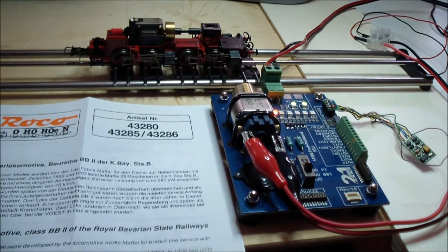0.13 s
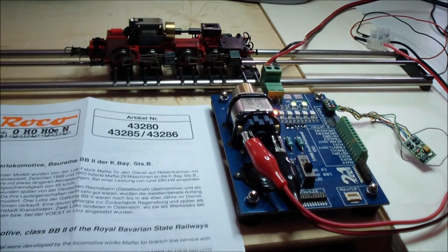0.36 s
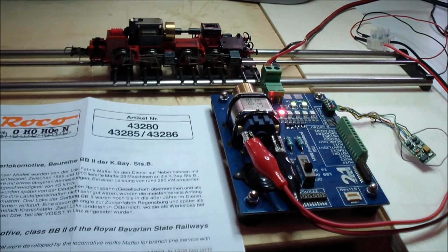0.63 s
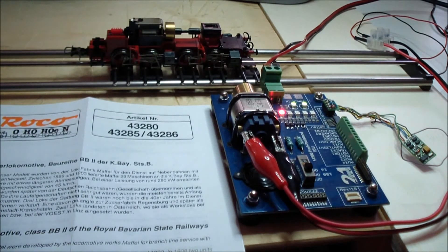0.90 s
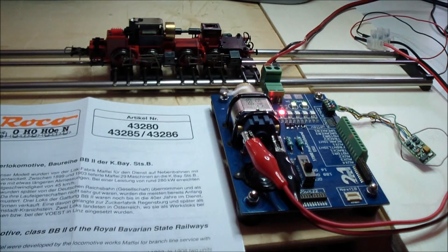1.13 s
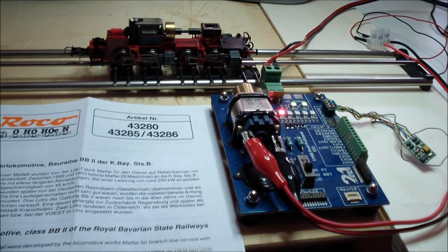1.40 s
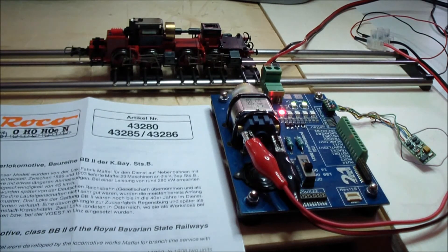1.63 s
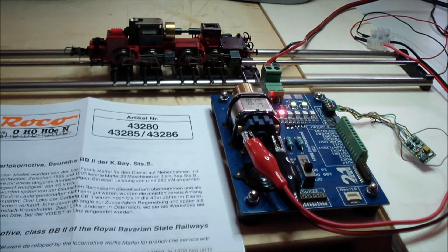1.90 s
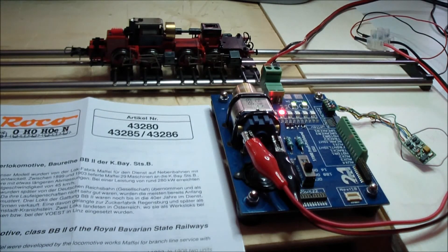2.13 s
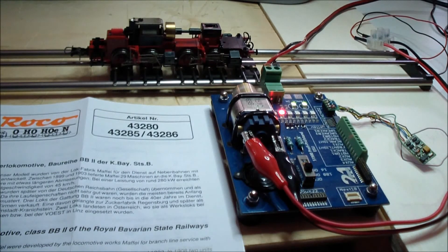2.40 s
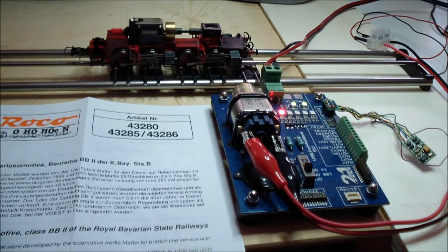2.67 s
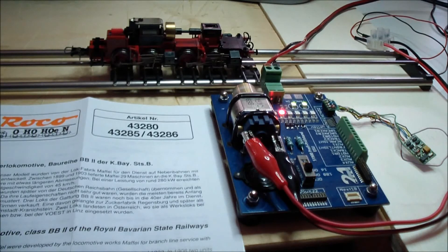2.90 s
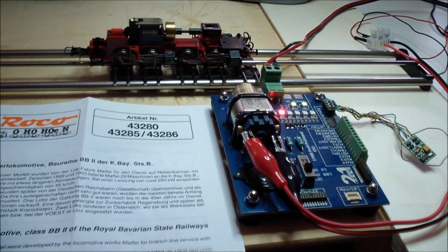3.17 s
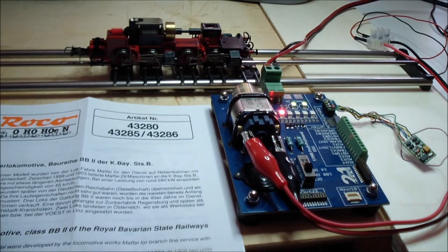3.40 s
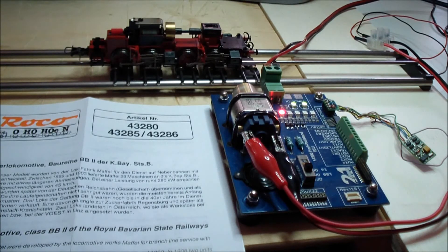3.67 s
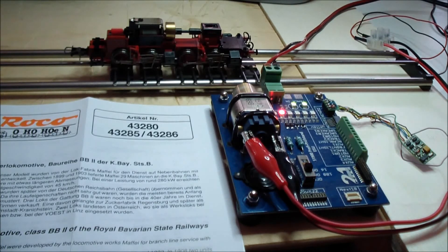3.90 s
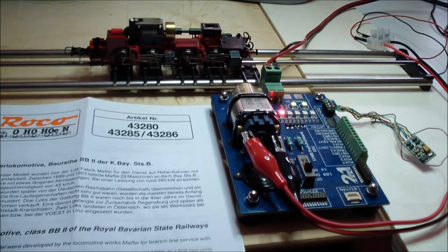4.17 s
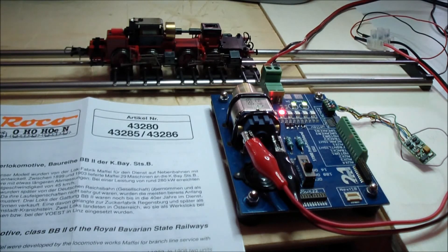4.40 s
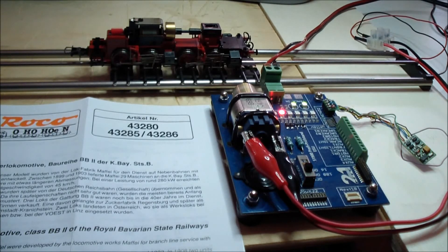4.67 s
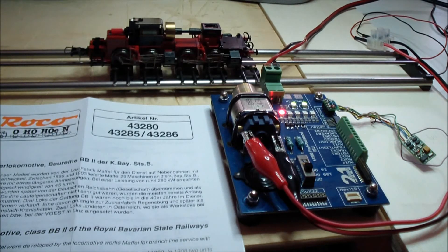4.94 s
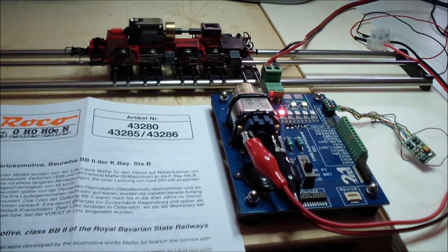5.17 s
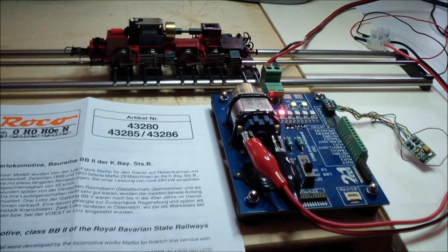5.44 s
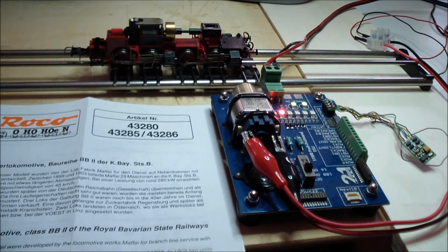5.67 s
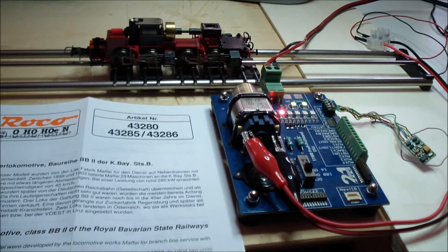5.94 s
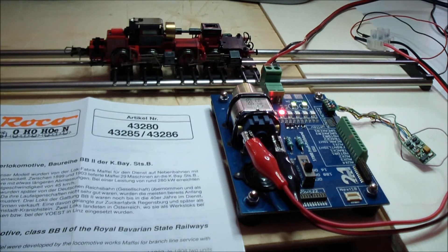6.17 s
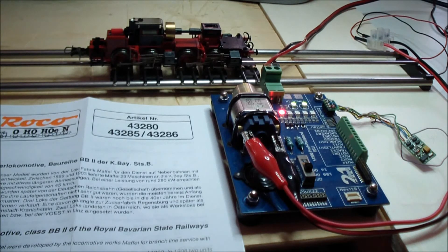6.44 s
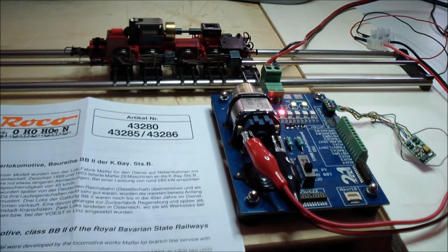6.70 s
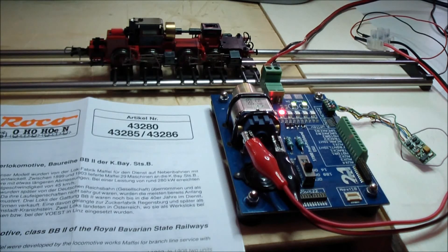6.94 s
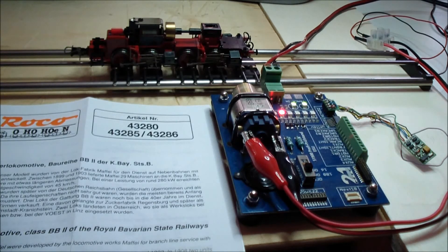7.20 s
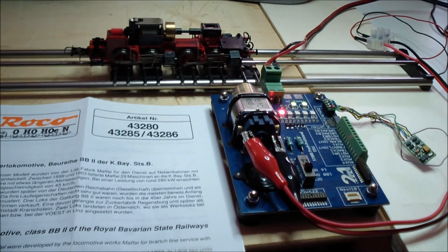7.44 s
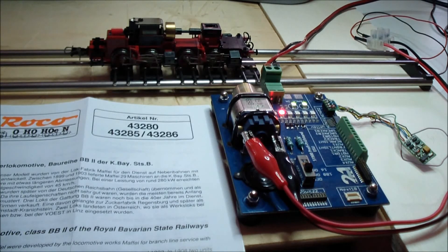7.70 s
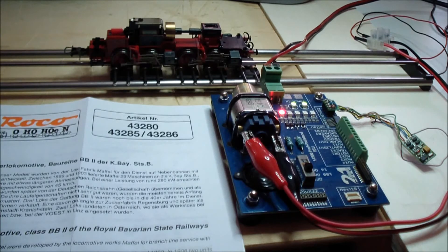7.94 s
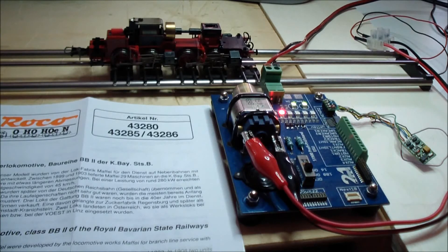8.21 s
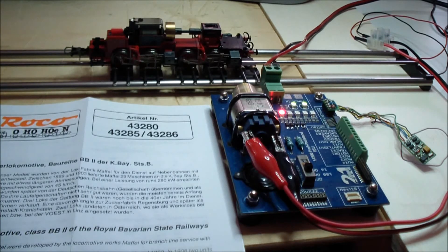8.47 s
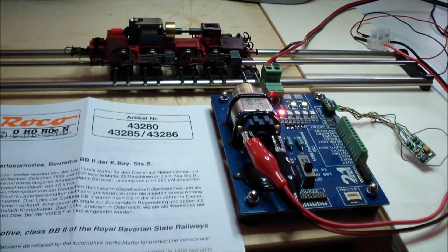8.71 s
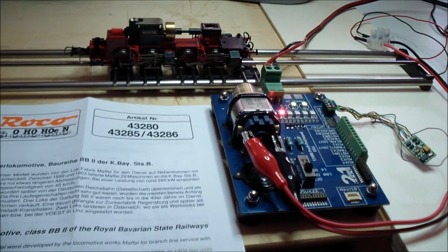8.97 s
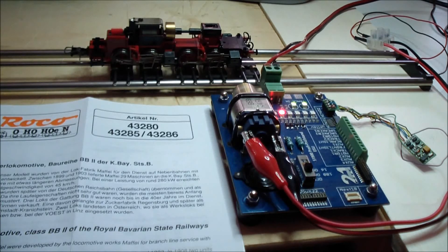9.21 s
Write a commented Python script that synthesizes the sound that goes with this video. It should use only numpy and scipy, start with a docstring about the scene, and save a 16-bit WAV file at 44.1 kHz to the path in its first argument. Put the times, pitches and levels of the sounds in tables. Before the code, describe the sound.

A small model locomotive motor ticks slowly, nearly stops, clicks free, then runs up to a steady bright brush whir with a thin whine.

```python
"""A slow chatter of gear ticks over room hiss and rumble, from a model locomotive on a roller stand indoors.
It falls nearly silent, breaks free with a click and runs up to a steady brush whir with a thin commutator whine.
Ticks and brush contacts are impulses and noise bursts ringing resonances; the whine is combed noise.
Gearbox and controller hum are wavering sines; chassis drone, hiss and rumble are filtered noise.
Weak sound drops out in short blocks, and the stereo width comes and goes in patches."""
import sys
import numpy as np
from scipy import signal
from scipy.fft import rfft, irfft, next_fast_len
from scipy.io import wavfile
from scipy.ndimage import uniform_filter1d, map_coordinates

SR = 44100
rng = np.random.default_rng(int(sys.argv[2]) if len(sys.argv) > 2 else 0)


def transcribe(u):
    """Save the signal u as a 16-bit wav file named by the first command-line argument.

    u: samples, shape (n,) or (channels, n), limited to [-1, 1]; the rate is SR.
    q: integer samples, one column per channel.
    """
    v = np.clip(np.atleast_2d(u).T, -1, 1)
    q = np.round(v * 32767).astype(np.int16)
    wavfile.write(sys.argv[1], SR, q)


def magnitude_from_level(level_db):
    """Linear magnitude for a level in decibels (20 dB per decade)."""
    exponent = np.asarray(level_db, float) / 20
    return 10 ** exponent


N = 411894
T = np.arange(N) / SR
BLOCK = 1882  # samples in a spectral block


def unit(x):
    """Scaled to rms 1."""
    return x / np.sqrt(np.mean(x ** 2) + 1e-20)


def even(x):
    """Steady loudness however fast the contacts come."""
    return x / np.sqrt(abs(uniform_filter1d(x ** 2, SR // 4)) + 1e-20)


def along(points, hz):
    """Reads (pitch_hz, value) points on a log pitch axis."""
    point_hz, value = np.transpose(points)
    return np.interp(np.log(hz + 1), np.log(point_hz + 1), value)


def curves(rows):
    """One value per sample for each column after the time."""
    s, *columns = np.transpose(rows)
    return [np.interp(T, s, column) for column in columns]


def wobble(rate):
    """A smooth random curve, rate knots a second."""
    return map_coordinates(rng.standard_normal(int(N * rate / SR) + 4), [T * rate])


def bump(s, half_s):
    """A bell-shaped rise and fall around a moment."""
    return np.exp(-((T - s) / half_s) ** 2)


def filtered(x, response):
    """x times a complex response of frequency."""
    m = next_fast_len(N + 8192)
    return irfft(rfft(x, m) * response(np.fft.rfftfreq(m, 1 / SR)), m)[..., :N]


def resonances(modes):
    """Causal response of (pitch_hz, width_hz, level_db) modes, alternating in polarity."""
    def response(f):
        total = 0
        for k, (center, width, db) in enumerate(modes):
            damping = 1j * f * width
            total = total + (-1) ** k * magnitude_from_level(db) * damping / (center * center - f * f + damping)
        return total
    return response


def passes(turns, count, jitter):
    """Samples at which the shaft passes each of count marks a turn, and the mark numbers."""
    mark = np.arange(1, int(turns[-1] * count))
    uneven = mark + jitter * rng.standard_normal(len(mark))
    at = np.interp(uneven, turns * count, np.arange(N))
    return at.astype(int), mark % count


def bursts(at, db, decay_s, order=1):
    """Short lopsided noise bursts from the given samples; order 2 rounds the attack."""
    kicks = np.bincount(at, magnitude_from_level(db), N)
    gain = (np.e / (decay_s * SR)) ** (order - 1)
    poles = np.poly([np.exp(-1 / (decay_s * SR))] * order)
    envelope = signal.lfilter([gain], poles, kicks)
    return envelope * rng.uniform(-0.76, 1, N) * np.sqrt(3)


# brush and spring resonances in low, middle and high groups: pitch_hz, width_hz, level_db (relative)
BRUSH_MODES = [
    [(7353, 310, -8), (7920, 700, -9), (8813, 530, -5.5)],
    [(9920, 810, -7.5), (11085, 560, -5)],
    [(11700, 280, -10.5), (11880, 310, -5.5), (12780, 460, -5.5), (13220, 770, -5), (15800, 2060, -10.5)],
]
# chassis and stand resonances: pitch_hz, width_hz, level_db (relative)
CHASSIS_MODES = [(557.4, 37, -3), (768, 144, -6), (1194, 537, -4.5), (1995, 114, -0.5), (2448, 250, -6),
                 (2763, 21, 3.5), (3142, 454, -11.5)]
# gear ticks while the drive crawls and pulls away: start_s, level_db (relative), knock_db (against level_db)
GEAR_TICKS = [(0.001, -33.5, -6.5), (0.0614, -34, -7.5), (0.108, -37, -14), (0.157, -35, -9),
              (0.2067, -32.5, -12), (0.254, -34, -10.5), (0.3062, -38, -9), (0.345, -38, -7),
              (0.389, -36.5, -6), (0.4299, -41, -12), (0.764, -39, -6), (0.795, -41, -3.5), (0.83, -47, -9),
              (0.9004, -41, -7), (1.0444, -42, -9), (1.2471, -44, -6), (1.283, -40, -10),
              (1.4001, -42, -28), (1.427, -37, -23), (1.436, -27.5, -18), (1.49, -34, -28),
              (1.51, -28, -20), (1.5376, -26, -18), (1.5837, -28, -16), (1.6231, -30, -19),
              (1.665, -28, -16), (1.68, -33, -19), (1.6999, -32, -26), (1.738, -25, -18), (1.752, -32, -28),
              (1.8062, -21, -22), (1.866, -20, -20), (1.888, -25, -23), (1.9214, -21, -29),
              (1.9732, -20, -23), (2.0252, -19, -23.5), (2.0721, -25, -37), (2.115, -24, -34),
              (2.152, -26, -36), (2.17, -26, -30), (2.2022, -16, -26), (2.2313, -17, -25),
              (2.2604, -12.5, -27), (2.2871, -11, -27), (2.3125, -13.5, -25), (2.338, -10, -28),
              (2.3638, -12, -28), (2.386, -11, -24), (2.409, -18, -26), (2.43, -25, -30), (2.452, -17, -26)]
# bare snaps without a rattle: start_s, level_db (relative)
BARE_SNAPS = [(0.0745, -33), (0.2757, -32), (0.391, -34), (0.7647, -30), (0.831, -35), (0.848, -34),
              (0.865, -36), (0.8824, -35), (0.9777, -39), (1.0425, -34), (1.1248, -37), (1.2471, -35),
              (1.2965, -31), (1.4002, -33), (1.7938, -29), (1.9455, -29)]
# the rattle fades under the bare snap as the drive pulls: speed_turns_per_s, rattle_db (relative)
RATTLE_BY_SPEED = [(8, 12), (11, -1), (17, -14), (40, -20)]


def ticks(speed):
    """Gear teeth take up slack: a bright snap, a short rattle and a knock in the chassis."""
    start_s, level_db, knock_db = np.transpose(GEAR_TICKS)
    at = (start_s * SR).astype(int)
    rattle_db = level_db + np.interp(speed[at], *np.transpose(RATTLE_BY_SPEED)) - 8.0
    rattle = bursts(at, rattle_db, decay_s=0.003, order=2)
    snap = np.bincount(at, magnitude_from_level(level_db + 18), N) + rattle
    for snap_s, snap_db in BARE_SNAPS:
        snap[round(snap_s * SR)] += magnitude_from_level(snap_db + 21)
    thud = bursts(at, level_db + knock_db + 15, decay_s=0.0067)
    knock = thud + np.bincount(at, magnitude_from_level(level_db + knock_db + 25), N)
    bright_modes = sum(BRUSH_MODES, [])[:-1]  # all but the broad top mode
    return filtered(snap, resonances(bright_modes)) + filtered(knock, resonances(CHASSIS_MODES))


# colour of the room and microphone hiss: pitch_hz, density_db (relative)
HISS_COLOUR = [(18, -13), (30, -24), (55, -3), (77, -5.5), (127, -5.5), (344, -9), (775, -14.5),
               (931, -20.5), (5540, -23), (7780, -25), (15800, -38)]
# width of the hiss: pitch_hz, side_minus_mid_db
HISS_WIDTH = [(60, -6), (380, -6.5), (2380, -5), (15000, 1)]
# swells of the low rumble: center_s, half_length_s, level_db
RUMBLE_SWELLS = [(1.1, 0.3, -60), (2.198, 0.33, -44.5), (4.666, 0.073, -50), (6.885, 0.08, -49),
                 (8.25, 0.047, -53), (9.137, 0.11, -54)]


def room():
    """Noise coloured into hiss, and a narrow low rumble that leans left, as mid and side."""
    def colour(f):
        mid_db = along(HISS_COLOUR, f)
        return magnitude_from_level([mid_db, mid_db + along(HISS_WIDTH, f)])

    hiss = filtered(rng.standard_normal((2, N)), colour)
    hiss = hiss * magnitude_from_level(-50.5 + 1.5 * wobble(12)) / np.std(hiss[0])
    boom = resonances([(45.5, 12, 0)])
    low = unit(filtered(rng.standard_normal((2, N)), lambda f: boom(f) ** 2))
    swell = magnitude_from_level(-64 + wobble(5.7))
    for center_s, half_s, db in RUMBLE_SWELLS:
        swell = swell + magnitude_from_level(db) * bump(center_s, half_s)
    return hiss + swell * np.array([low[0], magnitude_from_level(-11.0) * low[0] + magnitude_from_level(-15) * low[1]])


# controller hum: pitch_hz, level_db (rms, before its swell and waver)
HUM_PARTIALS = [(134.6, -66), (269.2, -61.5), (532, -62.5), (800, -66.5), (935, -70.5), (1068, -72)]


def hum():
    """The controller's wavering sines sink in the pause, swell in the pull-up and settle lower."""
    swell_db = np.interp(T, [.45, .5, .75, .9, 1.6, 1.9, 2.3, 2.7], [-1, -21, -9.0, 0.5, 2, 4.5, 0.5, -3.5])
    total = 0
    for hz, db in HUM_PARTIALS:
        level = np.sqrt(2) * magnitude_from_level(db + 3.8 * wobble(6.6))
        total = total + level * np.sin(2 * np.pi * hz * T + 0.8 * wobble(9.9))
    return magnitude_from_level(swell_db) * total


# the ten brush contacts of one turn, fed to each resonance group: low_db, middle_db, high_db (relative)
CONTACT_PATTERN = [(-1, -4, -4), (-9, -9, -9), (-4, -5, -6), (-7, -1, -1), (-10, -8, -7), (-7, -6, -7),
                   (-14, -14, -13), (-7, -2, -5), (1, -2, 1), (-6, -2, -9)]


def brushes(turns, speed):
    """Every segment edge snaps under a brush, crisper at low speed; between edges the brush scrubs."""
    settle = 1.04  # the resonances rise to the listed pitches by this ratio near full speed
    at, mark = passes(turns, count=10, jitter=0.069)
    luck_db = 1.6 * rng.standard_normal(len(at))
    fast = np.clip((speed - 60) / 26, 0, 1) * np.pi / 2  # crossfade angle
    crisp = (85 / speed) ** .55 * np.clip((speed - 4) / 5, 0, 1)
    whir = 0
    for group, pattern_db in zip(BRUSH_MODES, np.transpose(CONTACT_PATTERN)):
        db = pattern_db[mark] + luck_db
        rough = unit(bursts(at, db, decay_s=.0002, order=2))
        clicks = unit(np.bincount(at, magnitude_from_level(db), N))
        snaps = unit(rough + 1.4 * clicks)
        scrub = magnitude_from_level(-.8) * rng.standard_normal(N)
        ring = resonances(group)
        low, high = filtered(snaps * crisp + scrub, lambda f: [ring(f * settle), ring(f)])
        whir = whir + np.cos(fast) ** 2 * low + np.sin(fast) ** 2 * high
    return even(filtered(whir, lambda f: 1 / (1 + (6800 / (f + 1)) ** 18)))  # steep low cut


def drone(whir_db):
    """Noise rings the chassis, growing more slowly than the whir."""
    level_db = -47 + 0.6 * (whir_db + 27.0) + 1.77 * wobble(13)
    return magnitude_from_level(level_db) * unit(filtered(rng.standard_normal(N), resonances(CHASSIS_MODES)))


# shaft orders that sing in the gearbox: multiple (of shaft rate), level_db (rms, before boost and
# waver), boost_share (of the pull-up boost; negative softens)
SHAFT_ORDERS = [(2.008, -61, 0.1), (10, -64, -1), (13.14, -63, 0), (14.97, -59.5, 0.9), (16.73, -69, 0),
                (25.2, -60, 0.3), (31.7, -60.5, 0), (35.26, -66, 0), (45.1, -61, 0), (47.3, -64, 0),
                (50.2, -60, 0), (55.1, -60, 0), (60.4, -62, 0), (64.4, -66, 0), (70.3, -59, 0),
                (75.2, -59, 0)]


def gearbox(speed, turns):
    """Shaft orders, slightly unsteady, rise with the speed; pull-up makes some louder and one softer."""
    acceleration = uniform_filter1d(np.gradient(speed) * SR, SR // 8)  # turns per s, per s
    pull_db = .09 * np.clip(acceleration, 0, 90)
    total = 0
    for multiple, db, share in SHAFT_ORDERS:
        full_at = min(68 + multiple / 3, 85)  # turns per s
        wake = np.clip(speed / full_at, 0, 1) ** (5 + multiple / 2)  # high orders wake late
        level = np.sqrt(2) * magnitude_from_level(db + share * pull_db + 4.2 * wobble(15))
        total = total + wake * level * np.sin(2 * np.pi * multiple * (turns + 0.003 * wobble(25)))
    return total


# colour of the commutator whine: pitch_hz, level_db (relative)
WHINE_COLOUR = [(1500, -84), (2140, -8.5), (3000, -8.5), (3400, -27.5), (3850, -1.5), (4330, -1),
                (4960, -2.5), (5560, -3), (5730, -2.5), (6000, 4), (6800, -2), (8000, -7.5)]
# dark gaps that ride on the speed once it is high: multiple (of shaft rate), half_width (in multiples)
WHINE_GAPS = [(52.0, 1.1), (57.5, .8), (62.5, .3), (66.5, .9), (72.3, .35)]
# how deeply the segment comb cuts the whine at full speed: pitch_hz, share (before waver)
COMB_DEPTH = [(3000, 0.51), (3900, 0.34), (4100, 0.086), (4450, 0.46), (4900, 0.59), (5300, 0.44),
              (5700, 0.24), (6200, 0.37), (7000, 0.75)]


def whine(speed):
    """Five segments repeat earlier rasp: an uneven comb rides on the speed, wavering band by band."""
    noise, full = rng.standard_normal(N), speed[-1]
    gaps = filtered(noise, lambda f: sum(np.exp(-((f / full - k) / half) ** 4) for k, half in WHINE_GAPS))
    # both noises are read at a rate that follows the shaft
    ride = np.cumsum(np.clip(speed / full, .8, None) + .006 * wobble(6))
    noise, gaps = (map_coordinates(v, [ride], mode="mirror") for v in (noise, gaps))
    depth = np.clip((speed - 72) / 10, 0, 1) * np.clip(1 + .17 * wobble(5), 0, 1)
    rasp = filtered(noise - depth * gaps, lambda f: magnitude_from_level(along(WHINE_COLOUR, f)))
    step = SR / (5 * speed) * (1 + .002 * wobble(12))  # samples from segment to segment
    echoes = 0
    for k, share in enumerate([1.05, .5, .12], start=1):
        echoes = echoes + share * map_coordinates(rasp, [np.arange(N) - k * step])
    edges_hz = [0, 4050, 4900, 5750, 6600, SR]
    comb = 0
    for lo, hi in zip(edges_hz, edges_hz[1:]):
        band = filtered(echoes, lambda f: along(COMB_DEPTH, f) * (f >= lo) * (f < hi))
        comb = comb + magnitude_from_level(2.15 * wobble(7)) * band
    return even(rasp + comb * np.clip(speed / 84, 0, 1) ** 3)


# motor shaft before hunting: time_s, speed_turns_per_s
SHAFT_SPEED = [(0, 6.69), (1.2, 6.69), (1.36, 10.49), (1.55, 10.84), (1.86, 16.85), (2.04, 20.59),
               (2.2, 31.67), (2.45, 48.43), (2.6, 59), (2.8, 75.3), (2.92, 83), (3.1, 87.2), (3.3, 87.3),
               (3.45, 86.4), (4.7, 85.4), (9.34, 84.9)]
# brush whir grows with the speed: speed_turns_per_s, level_db (before pause, dips and flutter)
WHIR_BY_SPEED = [(6.3, -57.5), (10.5, -50), (12, -45.5), (16, -43.5), (23, -44.5), (32, -36.5), (46, -30),
                 (55, -27), (70, -25.5), (86, -25)]
# the whir briefly dips or lifts: center_s, change_db
WHIR_DIPS = [(5.5, -1.5), (6.1, -2.5), (6.57, -1.3), (9.3, 0.5)]


def motor():
    """One shaft speed drives brushes, whine, chassis drone, gearbox and ticks."""
    speed, = curves(SHAFT_SPEED)
    speed = speed + .45 * wobble(3) * (speed / speed.max()) ** 8  # the shaft hunts near full speed
    turns = np.cumsum(speed) / SR
    off_s, on_s, fade_s = 0.41, 0.77, 0.05  # the drive pauses
    idle = np.interp(T, [off_s, off_s + fade_s, on_s - fade_s / 2, on_s + fade_s / 2], [0, 1, 1, 0])
    whir_db = np.interp(speed, *np.transpose(WHIR_BY_SPEED)) - 15 * idle
    for center_s, change_db in WHIR_DIPS:
        whir_db = whir_db + change_db * bump(center_s, half_s=0.037)
    # the load flutters as wheels meet the rollers
    load_db = wobble(2.027) * 0.5 + wobble(20) * 0.19 + wobble(45) * 0.04
    whir = magnitude_from_level(whir_db + load_db) * (brushes(turns, speed) + magnitude_from_level(-10.5) * whine(speed))
    return whir + drone(whir_db) + gearbox(speed, turns) + ticks(speed)


# width of the smeared motor and hum: pitch_hz, side_minus_mid_db
NEAR_WIDTH = [(60, -2), (550, -7), (1400, -6), (2800, -11.5), (5600, -16.5), (10000, -12.5), (14000, -8)]
# direct motor and hum leaning left (negative: right): pitch_hz, share
LEFT_LEAN = [(40, 0.054), (500, -0.16), (4000, -0.037), (9000, -0.027), (13000, 0.045)]


def scene():
    """Nearby surfaces smear a copy of the motor and hum into the side channel."""
    near = motor() + hum()
    tail = rng.standard_normal(SR // 4) * magnitude_from_level(-60 * T[:SR // 4] / 0.33)  # falls 60 dB in 0.33 s
    spread = signal.fftconvolve(near, tail / np.linalg.norm(tail))[:N]
    wide = filtered(spread, lambda f: magnitude_from_level(along(NEAR_WIDTH, f)))
    lean = filtered(near, lambda f: along(LEFT_LEAN, f))
    mid, side = room() + [near, wide + lean]
    return np.array([mid + side, mid - side])


# how readily weak sound drops out: pitch_hz, threshold_offset_db
DROPOUT_BIAS = [(60, -0.5), (180, 2.5), (300, 7), (450, 0), (1000, 0.5), (1600, 0), (2600, 0.5), (3400, 3),
                (4500, 1), (5700, 3), (7000, -4)]


def flicker(x):
    """Weak spectrum drops out in short blocks, under a restless threshold that follows the loudness."""
    hz, _, z = signal.stft(x, SR, nperseg=BLOCK)
    count = z.shape[2]
    pitch = hz[:, None]
    power = uniform_filter1d(np.mean(abs(z) ** 2, axis=0), size=3, axis=0) + 1e-14
    loud_db = 10 * np.log10(power.sum(axis=0))
    # luck held for two blocks at a time
    blocks = np.repeat(np.diff(rng.standard_normal((len(hz), count // 2 + 2))), 2, axis=1)[:, :count]
    beat = (-1) ** np.arange(count) * rng.uniform(0, 2.25, count)  # the bass throbs from block to block
    lulls = uniform_filter1d(rng.standard_normal(z.shape[1:]), size=8, axis=0)
    lulls = unit(uniform_filter1d(lulls, size=5, axis=1))
    bass_db = (1.4 * blocks[0] + 3.16 * beat + 1.1 * lulls) / (1 + (pitch / 1800) ** 4)
    restless_db = 3.7 * unit(uniform_filter1d(blocks, size=30, axis=0)) + bass_db
    restless_db = restless_db * np.clip(2 + (loud_db + 36) / 18, .4, 1)
    # few drop-outs while the motor pulls away
    calm_db = np.interp(loud_db, [-52, -44, -34, -29], [-4, -5, -5, 0])
    tilt_db = along(DROPOUT_BIAS, hz)[:, None] - 9 * (pitch / 8000) ** 2
    threshold_db = -68 + 0.41 * (loud_db + 25.0) + calm_db + restless_db + tilt_db
    below = np.tanh((threshold_db - 10 * np.log10(power)) / 2.43)
    return signal.istft(z * magnitude_from_level(-19 * (1 + below)), SR, nperseg=BLOCK)[1][..., :N]


# how easily the stereo width drops out: pitch_hz, threshold (in spreads of chance)
WIDTH_DROPOUT = [(300, -2.5), (1000, -1.2), (2600, -.4), (4500, .3), (6000, .1), (8300, -1.2),
                 (11000, -2.5)]


def patchy_width(pair):
    """The width collapses to the middle in patches of time and pitch."""
    mid, side = (pair[0] + pair[1]) / 2, (pair[0] - pair[1]) / 2
    hz, _, z = signal.stft(side, SR, nperseg=BLOCK)
    luck = rng.standard_normal(z.shape)
    field = unit(uniform_filter1d(uniform_filter1d(luck, size=12, axis=0), size=4, axis=1))
    field = unit(field + 1.3 * unit(uniform_filter1d(luck[0], size=4)))  # part shared by all pitches
    quiet = np.sum(abs(z) ** 2, axis=0) < magnitude_from_level(2 * -48)  # side power under -48 dB
    threshold = along(WIDTH_DROPOUT, hz)[:, None] - 1.2 * quiet  # a quiet side is kept more readily
    side = signal.istft(z * (field > threshold), SR, nperseg=BLOCK)[1][:N]
    return np.array([mid + side, mid - side])


def band_limit(x):
    """A steep low-pass at the top of the band."""
    return signal.sosfilt(signal.butter(12, 17020, fs=SR, output="sos"), x)


def record(dry):
    """The top is cut, then weak sound and stereo width flicker."""
    dull = filtered(dry, lambda hz: hz < 15750)
    heard = patchy_width(flicker(dull))
    return band_limit(heard)


dry = scene()
out = record(dry)
transcribe(out)
```